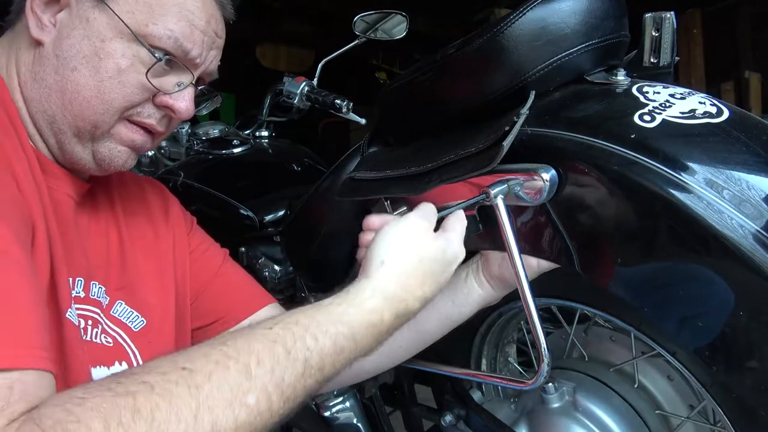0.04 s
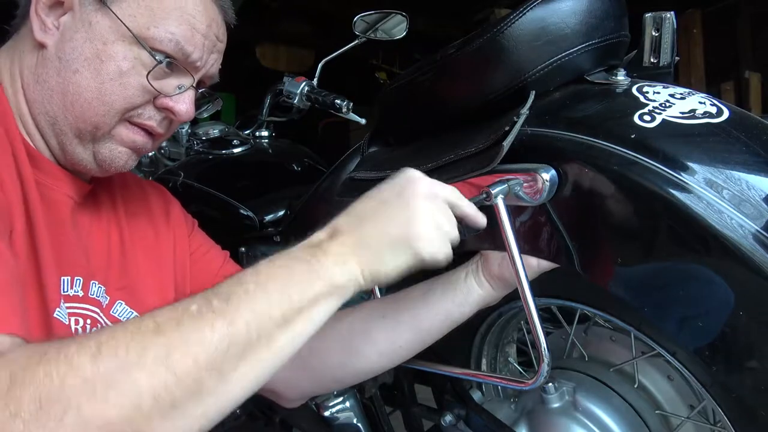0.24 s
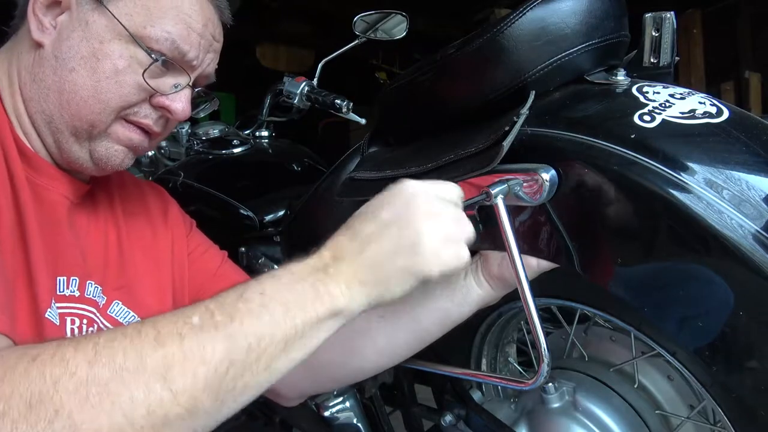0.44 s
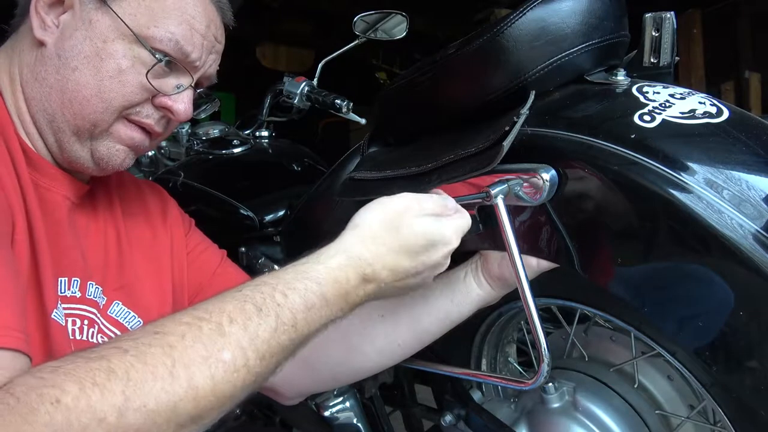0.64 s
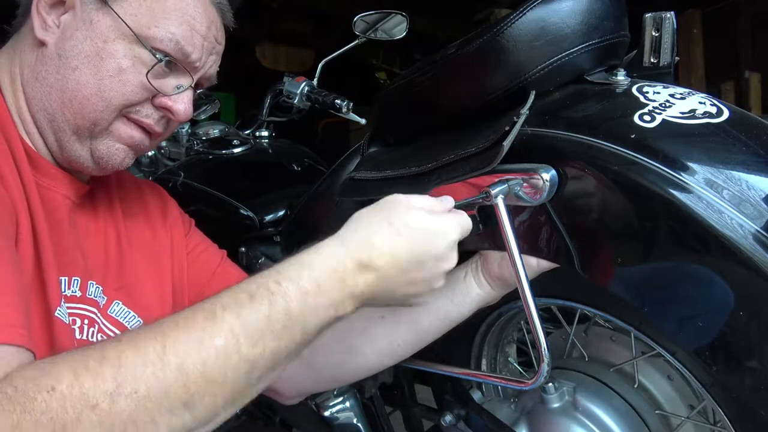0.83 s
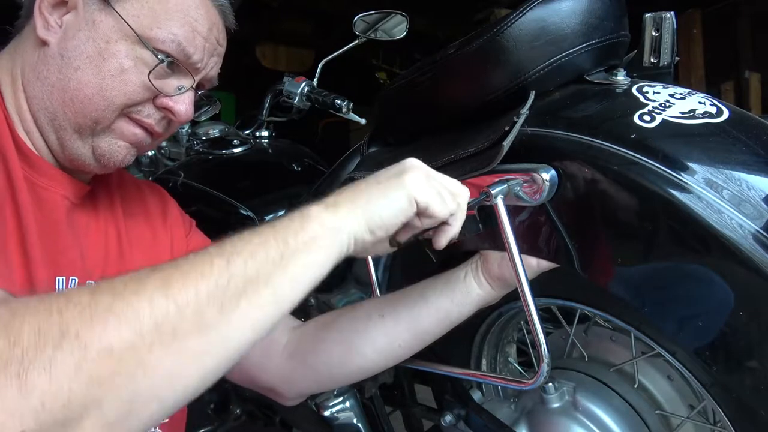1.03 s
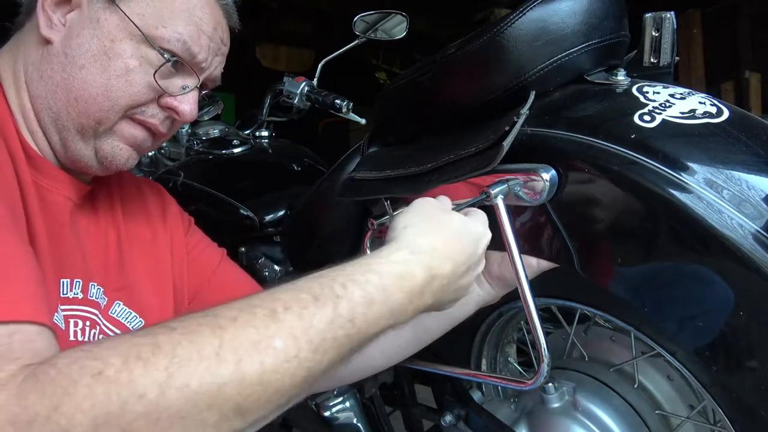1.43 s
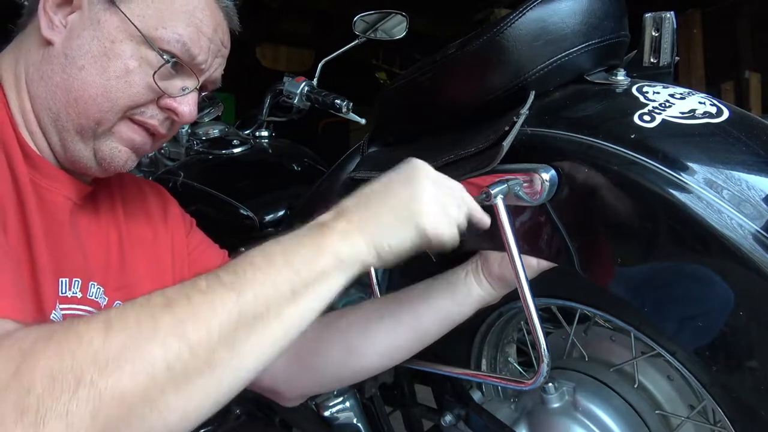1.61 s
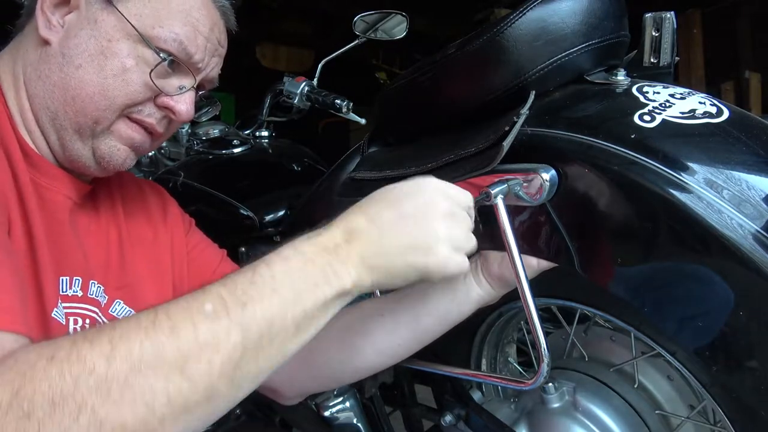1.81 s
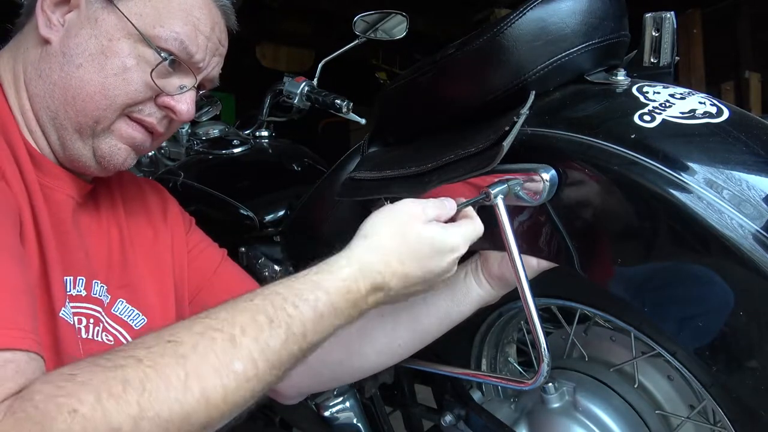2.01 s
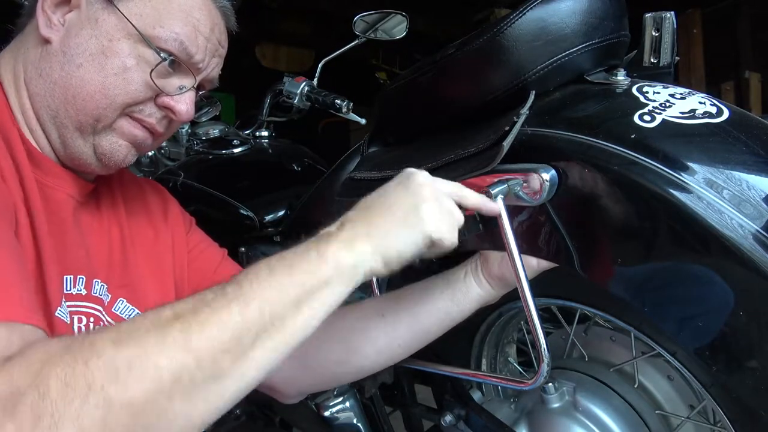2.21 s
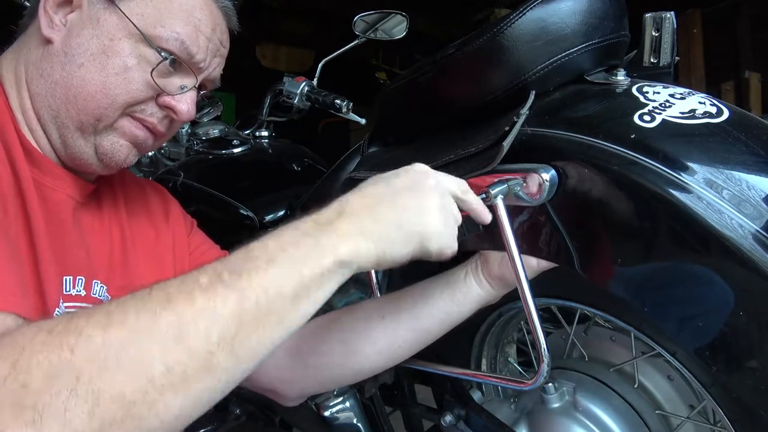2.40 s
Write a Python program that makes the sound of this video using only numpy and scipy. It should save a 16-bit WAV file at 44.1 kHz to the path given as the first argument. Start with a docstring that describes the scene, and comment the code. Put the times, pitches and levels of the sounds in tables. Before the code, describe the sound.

High metal squeaks and clicks from a wrench turning a bolt, over a faint hum.

```python
"""In a garage, a motor hums like a fan while a hand wrench turns a bolt on a motorcycle's steel bracket.
The wrench scrapes and clicks onto the bolt, then the dry thread sticks and slips in gliding squeaks
that jump to a piercing squeal. A faint rumble follows. The second stroke gives one high chirp, the
third gives lower squeaks and another rumble, and the fourth a last run of squeaks and two soft clicks.
Between strokes the wrench clicks and scrapes on the bolt head; tool and thread ring on in the room."""
import sys
import numpy as np
from scipy import signal
from scipy.fft import rfft, irfft
from scipy.io import wavfile
from scipy.ndimage import uniform_filter1d

SR = 44100
rng = np.random.default_rng(int(sys.argv[2]) if len(sys.argv) > 2 else 0)


def store_wav(level_fs):
    """Save 16-bit WAV to argv[1]."""
    pcm = np.round(np.clip(np.atleast_2d(level_fs), -1, 1) * 32767)
    wavfile.write(sys.argv[1], SR, pcm.T.astype(np.int16))


N = 112454
TOP_HZ = 15725  # upper edge of the treble


def undb(db):
    """Turn decibels into a number to multiply by."""
    return 10 ** (np.asarray(db) / 20)


def unit(x):
    """Scale a signal to an average strength (rms) of 1."""
    return x / np.sqrt(np.mean(x ** 2))


def pan(x, db):
    """Make the left side db decibels louder than the right."""
    return x * undb(np.array([[db], [-db]]) / 2)


def spread(mid, side, share):
    """Widen a sound: add a share of side on the left and subtract it on the right."""
    return mid + share * side * np.array([[1], [-1]])


def on_log_axis(points, hz):
    """Read a curve of (pitch_hz, value) points at the pitches hz."""
    point_hz, value = np.array(points).T
    return np.interp(np.log(hz + 1), np.log(point_hz), value)


def noise(colour, tilt_db=0):
    """Noise of strength 1, shaped by (pitch_hz, level_db) points and brightened by tilt_db per octave."""
    hz = np.arange(N // 2 + 1) * SR / N
    gain = undb(on_log_axis(colour, hz) + tilt_db * np.log2(1 + hz / 100))
    return unit(irfft(rfft(rng.standard_normal(N)) * gain, N))


def wander(per_s):
    """A random curve of strength 1 that slides to a new value per_s times a second."""
    step = max(int(SR / per_s), 2)
    stairs = np.repeat(rng.standard_normal(N)[:N // step + 1], step)[:N]
    return unit(uniform_filter1d(stairs, step))


def strike(age, rise_s, decay_s):
    """The loudness of a knock: a quick rise, then a fade."""
    return np.clip(age / rise_s, 0, 1) * np.exp(-np.maximum(age - rise_s, 0) / decay_s)


def room_air():
    """Air rushes softly in the room, a little different in each ear."""
    # colour of the rush: pitch_hz, level_db
    air_colour = [(15, -49), (25, -21), (112, -12.5), (133, -5.5), (152, -6.5), (173, -24.5), (240, -10.5),
                  (340, -18), (598, -22.5), (919, -23.5), (2120, -32), (3630, -46), (6920, -50),
                  (15500, -57)]
    return undb(-39.5) * spread(noise(air_colour), noise(air_colour), share=0.34)


def motor_hum():
    """A running motor hums in three low tones that waver in loudness and pitch."""
    # tones of the motor: pitch_hz, level_db
    tones = [(147.8, -38.5), (240, -54.5), (366, -54.5)]
    waver_db, pitch_drift = 2, 0.00826
    hum = 0
    for hz, db in tones:
        peak = np.sqrt(2) * undb(db + waver_db * wander(per_s=25))
        speed = 1 + pitch_drift * wander(per_s=13)
        hum += peak * np.sin(2 * np.pi * hz * np.cumsum(speed) / SR)
    return pan(hum, 0)


def garage_tail(t):
    """The garage's many echoes blur into a tail that dies sooner in the treble."""
    # time the room takes to fade by 60 dB: pitch_hz, fade_s
    fade_times = [(200, 0.5), (2700, 0.37), (4000, 0.42), (7200, 0.34), (14500, 0.21)]
    level_db, gap_s = -8, 0.0033
    hz, age, bands = signal.stft(rng.standard_normal(SR), SR)
    fade = np.exp(-np.log(1000) * age / on_log_axis(fade_times, hz)[:, None])
    tail = signal.istft(bands * fade, SR)[1][:SR]
    onset = np.clip(t[:SR] / gap_s - 1, 0, 1)
    return undb(level_db) * unit(tail * onset) / np.sqrt(SR)


def near_echoes(sound):
    """Sound bounces off the fender, tank and floor and arrives a moment later."""
    # one row per bounce: delay_s, level_db, pan_db
    bounces = [(.0035, -12, 12), (0.0107, -9.5, -6.5), (0.017, -13, 1)]
    out = 0
    for delay, db, pan_db in bounces:
        delayed = np.pad(sound, ((0, 0), (int(delay * SR), 0)))[:, :N]
        out += undb(db) * pan(delayed, pan_db)
    return out


def rumbles(t):
    """Faint low rumbles come after the first and third strokes."""
    # one row per rumble: start_s, level_db, decay_s
    bumps = [(0.452, -36, 0.12), (1.734, -36, 0.086)]
    # colour of the rumble: pitch_hz, level_db
    bump_colour = [(22, -12), (38, 15), (52, -2), (72, 10.5), (110, -33), (2000, -80.5)]
    loudness = sum(undb(db) * strike(t - start, 0.0055, decay) for start, db, decay in bumps)
    return loudness * noise(bump_colour)


def wrench_scrapes(t):
    """The wrench scrapes in rough grains as the hand shifts."""
    # one row per scrape: middle_s, half_width_s, level_db, tilt_db_per_octave
    scrapes = [(0.149, 0.026, -39.5, 2.5), (0.184, 0.017, -27.5, 0), (.265, 0.017, -33, 0.5),
               (0.92, 0.067, -43, 6), (0.977, 0.036, -37.5, -.5), (1.296, 0.014, -46, 2.5),
               (1.527, 0.046, -41.5, -5), (1.622, 0.11, -37, 1.5), (1.92, 0.061, -45.5, -15.5),
               (2.46, 0.024, -38.5, -3.5)]
    # colour of the rubbing: pitch_hz, level_db
    scrape_colour = [(60, -27), (300, 7), (580, 1.5), (950, 5.5), (1500, -7.5), (2500, -2.5), (4500, -17),
                     (7000, -17.5), (11000, -27.5), (15500, -41.5)]
    rubbing, grain_db = 0, 3
    for middle, half_width, db, tilt in scrapes:
        swell = np.exp(-((t - middle) / half_width) ** 2)
        rubbing += undb(db) * swell * noise(scrape_colour, tilt)
    return rubbing * unit(undb(grain_db * wander(per_s=900)))


def wrench_clicks(t):
    """The wrench hits the bolt head with a crack and rings briefly."""
    # one row per click: start_s, level_db, decay_s, tilt_db_per_octave
    clicks = [(0.167, -27, 0.01, -1), (0.594, -36.5, 0.018, -10.5), (1.225, -44, .008, -6),
              (1.472, -21, 0.0091, -1.5), (2.006, -37.5, 0.0062, -6), (2.411, -35, 0.01, -9),
              (2.453, -44.5, 0.008, -11)]
    # colour of the crack: pitch_hz, level_db
    crack_colour = [(60, -36), (250, -16), (650, -6), (950, 0), (2000, 3.5), (2650, -6.5), (3400, 1.5),
                    (10000, -12.5), (15500, -35.5)]
    # tones that each click sets ringing: pitch_hz, level_db
    ring_tones = [(910, -6), (1480, -16), (2060, -10.5), (3420, -13.5), (4800, -23)]
    rise_s, ring_s = 0.00061, 0.014
    out = 0
    for start, db, decay, tilt in clicks:
        age = t - start
        crack = strike(age, rise_s, decay) * noise(crack_colour, tilt)
        ring = sum(undb(tone_db) * np.sin(2 * np.pi * hz * age) for hz, tone_db in ring_tones)
        out += undb(db) * (crack + strike(age, rise_s, ring_s) * ring)
    return out


def thread_squeaks(t):
    """The dry thread sticks and slips so fast that it sings; a stronger swing sounds harsher."""
    # one row per squeak: start_s, swell_s, hold_s, first_hz, last_hz, level_db,
    # second_harmonic_db, third_harmonic_db, wobble_percent, grit_db, pan_db
    squeaks = [ (0.208, 0.0065, 0.0015, 2862, 2816, -8, -23.5, -21, 1.45, -28, -4),
               (0.214, 0.016, 0.0046, 2848, 2770, -5.5, -17.5, -14.5, 1.27, -25.5, -4),
               (0.237, 0.0051, 0.0039, 2708, 2600, -19.5, -3.5, -18, 3.8, -8.5, -1),
               (0.247, 0.0065, 0.022, 2622, 2763, -26.5, -18, -29, 4.0, -12.5, -0.5),
               (0.275, 0.013, .003, 8470, 8070, -3.5, -22, -50, 1.8, -52, -3.5),
               (0.288, 0.0033, 0.083, 8340, 7990, -22.5, -26, -60, 2.1, -42, 4),
               (0.295, 0.0055, 0.032, 7097, 7273, -5, -14.5, -50, 1.8, -49, -3),
               (0.325, 0.0066, 0.034, 7305, 7164, -13, -19, -60, 2.1, -29.5, 2),
               (0.802, 0.016, 0.013, 7580, 7650, -51.5, -30, -54, 1.0, -14, -5),
               (0.89, 0.0035, 0.0048, 7150, 7010, -7.5, -21, -34, 0.82, -54, -3.5),
               (1.55, 0.016, 0.0015, 2910, 2730, -26.5, -12, -32, 1.8, -13, -5),
               (1.563, 0.0042, 0.007, 2628, 2470, -19.5, -5, -11, 4.1, -11, -3.5),
               (1.597, 0.0094, 0.0017, 2490, 2556, -24.5, -14, -26, 1.1, -38, -6),
               (1.641, 0.02, 0.0026, 1706, 1792, -14, -19, -25, 0.63, -18.5, -7),
               (1.657, 0.014, 0.023, 1838, 1881, -7.5, -14, -27.5, 0.79, -25.5, -5),
               (2.174, 0.023, 0.0026, 2694, 2654, -16.5, -22.5, -27, 0.32, -19, -6),
               (2.193, 0.012, 0.0075, 2778, 2642, -18, -5, -16, 1.7, -12, -0.5),
               (2.214, 0.0064, 0.0055, 2637, 2580, -5.5, -32, -31, 1.0, -21, -7),
               (2.229, 0.002, 0.052, 2576, 2641, -17.5, -30, -34, 2.71, -22, -3.5)]
    # colour of the dry thread's grit: pitch_hz, level_db
    grit_colour = [(40, -31.5), (200, -8.5), (500, 6.5), (900, -3), (1400, -6.5), (2400, 7.5), (4000, -7),
                   (5300, -7), (7000, -11), (13500, -19.5), (15500, -32)]
    release_s, wobbles_per_s, flutter_db = 0.00061, 350, 1.5
    jitter_radians, harmonic_step_db = 0.42, -12
    out, grit = 0, noise(grit_colour)
    for start, swell, hold, first_hz, last_hz, db, second_db, third_db, wobble, grit_db, pan_db in squeaks:
        age = t - start
        rise = np.sin(np.pi / 2 * np.clip(age / swell, 0, 1)) ** 2
        swing = rise * np.exp(-np.maximum(age - swell - hold, 0) / release_s)
        on = swing > 1e-4  # only while the squeak sounds
        glide_hz = np.interp(age, [0, swell + hold], [first_hz, last_hz])
        hz = glide_hz * (1 + wobble / 100 * wander(wobbles_per_s))
        phase = 2 * np.pi * np.cumsum(hz[on]) / SR
        # uneven slips blur the overtones, less so in steady squeaks
        slip_phase = phase + jitter_radians * np.tanh(wobble) * wander(per_s=730)[on]
        harmonics_db = [second_db] + [third_db + harmonic_step_db * k for k in range(4)]
        overtones = sum(undb(level) * np.sin(k * slip_phase)
                        for k, level in enumerate(harmonics_db, 2) if k * first_hz < TOP_HZ)
        harshness = swing[on] * (overtones + undb(grit_db) * grit[on])
        loudness = swing[on] * undb(db + flutter_db * wander(wobbles_per_s)[on])
        tone = np.zeros(N)
        tone[on] = loudness * (np.sin(phase) + harshness)
        out += pan(tone, pan_db)
    return out


def scene():
    """Squeaks and wrench sound over the hum; the garage's echoes widen as they fade."""
    t = np.arange(N) / SR
    direct = thread_squeaks(t) + pan(wrench_clicks(t) + wrench_scrapes(t), db=-5)
    width = 0.32 * (1 - np.exp(-t[:SR] / 0.05))
    garage = spread(garage_tail(t), garage_tail(t), width)
    echoes = signal.fftconvolve(direct, garage, axes=1)[:, :N]
    background = rumbles(t) + pan(motor_hum() + room_air(), db=-2.5)
    return background + direct + near_echoes(direct) + echoes


def record(dry):
    """A limiter turns everything down during piercing squeals; then peaks and top treble are cut off."""
    limit_db, attack_s, release_s, clip_level = -4.5, 0.0012, 0.022, 0.83
    treble = np.abs(np.diff(dry, prepend=0)).max(axis=0)
    excess = np.log(np.maximum(treble / undb(limit_db), 1))
    recovery = np.arange(N) / SR / release_s
    dip = np.maximum.accumulate(excess + recovery) - recovery  # catch each peak, then let go
    limited = dry * np.exp(-uniform_filter1d(dip, int(attack_s * SR)))
    low_pass = signal.ellip(10, 0.2, 70, TOP_HZ, fs=SR, output="sos")
    return signal.sosfilt(low_pass, np.clip(limited, -clip_level, clip_level))


dry = scene()
out = record(dry)
store_wav(out)
```